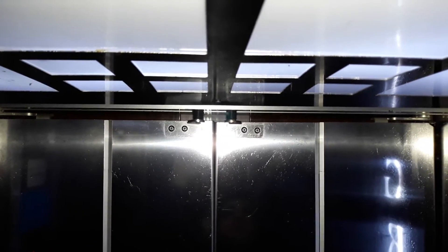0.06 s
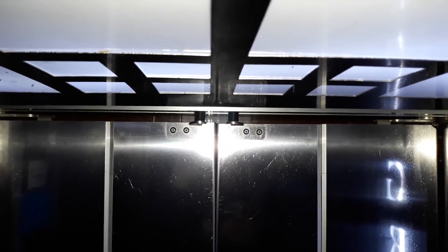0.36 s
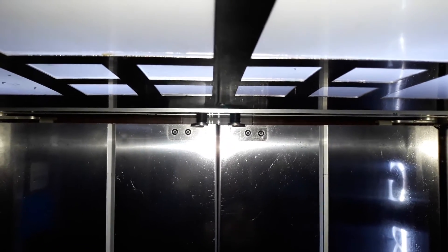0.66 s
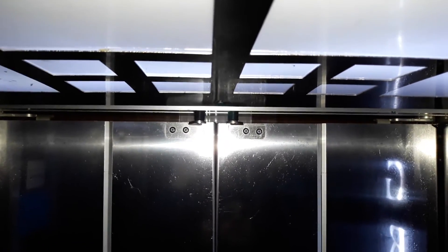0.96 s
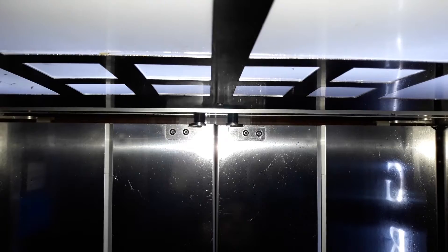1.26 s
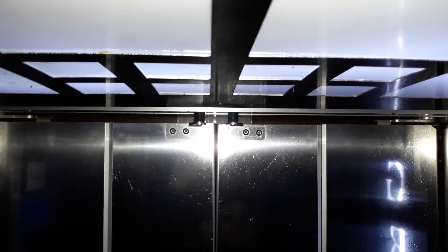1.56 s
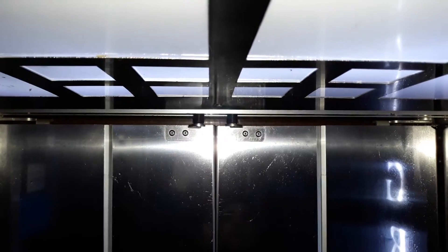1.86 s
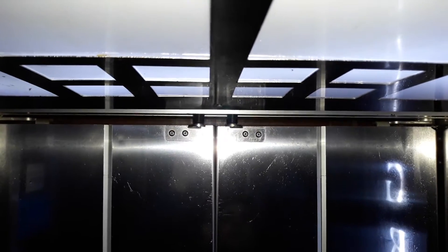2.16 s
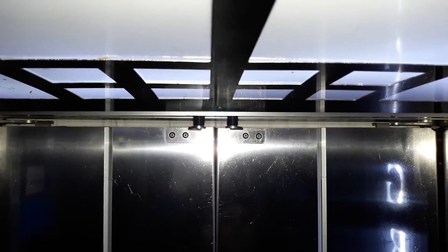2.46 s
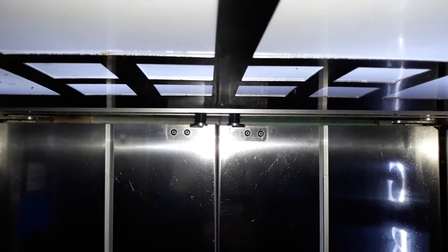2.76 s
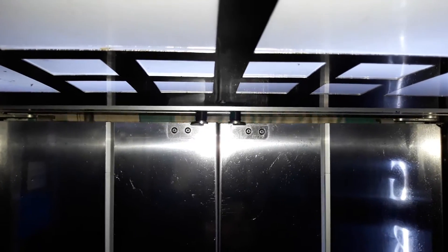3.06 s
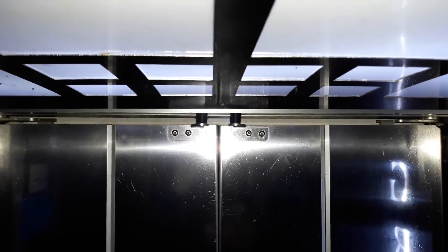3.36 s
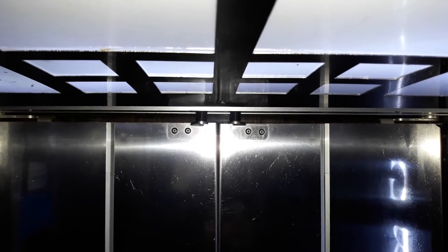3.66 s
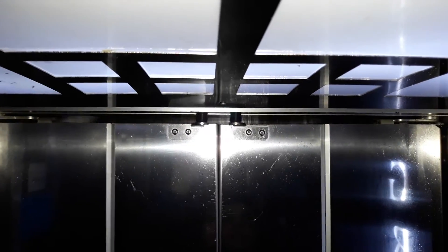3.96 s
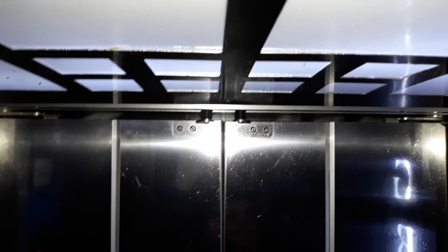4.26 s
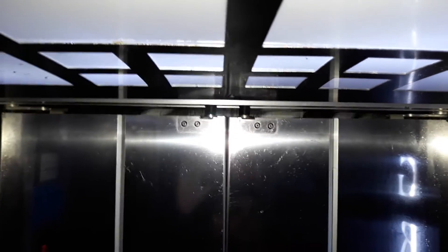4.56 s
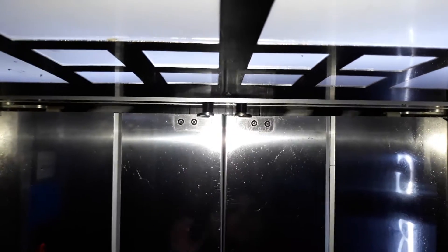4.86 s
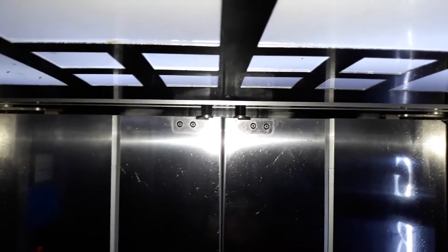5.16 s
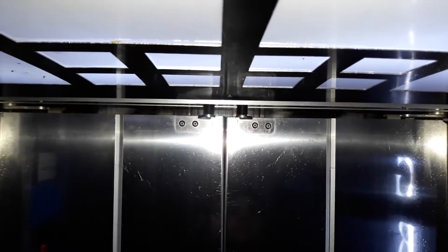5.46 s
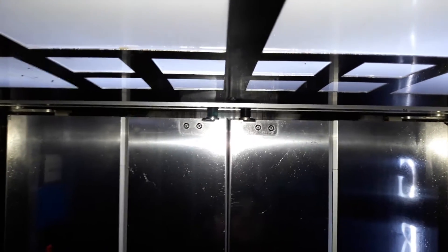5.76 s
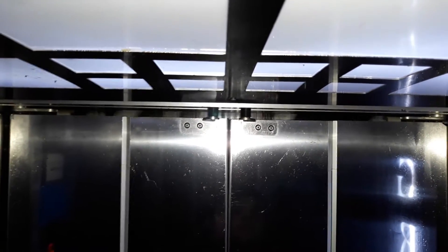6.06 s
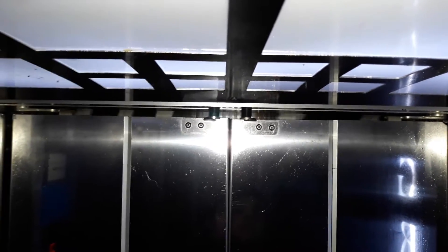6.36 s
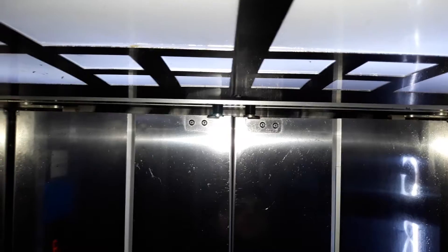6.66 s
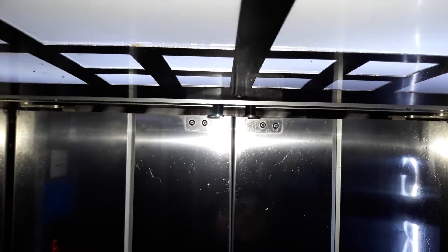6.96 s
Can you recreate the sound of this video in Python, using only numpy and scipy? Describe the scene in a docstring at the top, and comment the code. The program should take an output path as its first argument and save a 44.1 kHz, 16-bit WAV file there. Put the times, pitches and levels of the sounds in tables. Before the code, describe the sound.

Inside a closed steel elevator cab, the motor drones low, throbbing about three times a second over a faint rumble and air hiss. Close to the microphone, a hand rubs and ticks on something hard, making two hollow thuds and then one sharp knock. Afterwards the hum carries on, with a few faint, dull taps from the door panels and some light clicks near the end.

```python
"""Inside the closed steel cab of a travelling lift.
The hoist motor drones through the ropes and throbs about three times a second, once per turn of the
sheave. Behind it the guides rumble on the rails, air hisses in the shaft and a fan hums faintly.
Close by, a hand rubs and ticks on something hard by stick-slip friction and lands one sharp knock,
which excites the body's modes; the door panels give a few dull taps."""
import sys
import numpy as np
from scipy import signal
from scipy.fft import rfft, irfft
from scipy.io import wavfile
from scipy.ndimage import map_coordinates

SR = 44100
rng = np.random.default_rng(int(sys.argv[2]) if len(sys.argv) > 2 else 0)


def wav_record(signal):
    """Record a signal, one row per channel, as 16-bit PCM in the file named by sys.argv[1]."""
    frames = np.transpose(np.atleast_2d(signal))
    bounded = np.clip(frames, -1, 1)
    # unit amplitude maps onto the largest positive 16-bit level
    quanta = np.round(bounded * 32767).astype(np.int16)
    wavfile.write(sys.argv[1], SR, quanta)


N = 317948
TIME = np.arange(N) / SR
CUTOFF_HZ = 15700

# strokes of the hand: start t/s, duration/s, relative level/dB
STROKES = [(0, 0.82, -56), (0.136, 0.049, -34), (0.364, 0.021, -39.5), (.41, 0.072, -56),
           (0.611, 0.033, -34.5), (0.869, 0.11, -53.5), (1.144, 0.041, -58), (1.328, 0.13, -52),
           (1.835, 0.076, -36.5), (6.051, 0.023, -46), (6.279, 0.039, -61)]


def from_db(db):
    """Amplitude ratio of a level in decibels."""
    return 10 ** (np.asarray(db) / 20)


def rms_one(x):
    """Normalisation to unit rms."""
    return x / np.sqrt(np.mean(x ** 2) + 1e-20)


def in_time(rows):
    """Linear interpolation of (t/s, value) rows at every sample."""
    return np.interp(TIME, *np.transpose(rows))


def drift(rate):
    """Smooth random modulation: a spline through rate unit Gaussian values a second."""
    knots = rng.standard_normal(4096)
    return map_coordinates(knots, [TIME * rate], order=2, mode="mirror")


def tone(hz, waver_db, wander_rad):
    """A sinusoid of unit rms, then given slow random amplitude and phase modulation."""
    phase = 2 * np.pi * (hz * TIME + rng.random()) + wander_rad * drift(5)
    return np.sqrt(2) * np.sin(phase) * from_db(waver_db * drift(5))


def colour(x, spectrum):
    """Minimum-phase filtering by (f/Hz, relative level/dB) rows; white noise keeps its power."""
    size = 4096
    hz, db = np.transpose(spectrum)
    grid_hz = np.maximum(np.arange(size // 2 + 1) * SR / size, 1)
    magnitude = from_db(np.interp(np.log(grid_hz), np.log(hz), db))
    cepstrum = irfft(np.log(magnitude))
    response = irfft(np.exp(rfft(2 * cepstrum[:size // 2], size)))
    return signal.fftconvolve(x, response / np.linalg.norm(response))[:N]


def ring(force, hz, t60):
    """A damped oscillator: a unit impulse starts a decaying sinusoid of unit amplitude."""
    r, w = from_db(-60 / (t60 * SR)), 2 * np.pi * hz / SR
    return signal.lfilter([0, np.sin(w)], [1, -2 * r * np.cos(w), r * r], force + 1e-18)


def contacts(rows, t60, rise_s):
    """Impact noise: each contact is a short burst, and the softer it is, the lower its cutoff."""
    out, age = np.zeros(N + SR), np.arange(SR // 10) / SR
    envelope = (1 - np.exp(-age / rise_s)) * from_db(-60 * age / t60)
    for start, db, cutoff_hz in rows:
        burst = rng.standard_normal(len(age)) * envelope * from_db(db)
        lowpass = signal.butter(2, min(cutoff_hz, .45 * SR), fs=SR)
        at = int(start * SR)
        out[at:at + len(age)] += signal.lfilter(*lowpass, burst)
    return out[:N]


def cab(x, wet_db):
    """Reverberation: close steel walls reflect within milliseconds, and the treble decays first."""
    low_t60_s, high_t60_s = .29, .074
    age = np.arange(SR // 2) / SR
    echoes = rng.standard_normal(len(age)) * (age > .003)
    low = signal.lfilter(*signal.butter(1, 3000, fs=SR), echoes)
    tail = low * from_db(-60 * age / low_t60_s) + (echoes - low) * from_db(-60 * age / high_t60_s)
    return x + from_db(wet_db) * signal.fftconvolve(x, tail / np.linalg.norm(tail))[:N]


def shaft():
    """Broadband noise: the guides rumble on the rails, and air flow adds a thin, wavering hiss."""
    # spectra of guides and air: f/Hz, relative level/dB
    guide_spectrum = [(20, -15.5), (40, 1.5), (110, 13), (150, 1), (185, 4), (260, 2), (320, 0.5),
                      (380, -1), (470, -2.5), (550, -7.5), (730, -12.5), (780, -10.5), (860, -12),
                      (970, -22), (1600, -50), (4000, -70.5)]
    air_spectrum = [(700, -19), (1300, 1.5), (1570, -7), (1950, 3), (2200, 5.5), (2550, -1), (3250, -5),
                    (4900, -.3), (6600, -6.7), (8500, -6), (9400, -18), (10600, -21), (12200, -13.5),
                    (16000, -15)]
    # their envelopes: t/s, level/dB
    guide_levels = [(0, -47), (.2, -40), (1.2, -45.5), (2.1, -44.5), (2.8, -46), (3.9, -46), (5, -43.5),
                    (6.0, -46), (6.6, -47), (7.21, -48.5)]
    air_levels = [(0, -59), (2.15, -62), (2.9, -59.5), (3.75, -62.5), (4.5, -61), (5.65, -61.5),
                  (6.2, -60.5), (6.85, -65), (7.21, -60.5)]
    rumble = rms_one(colour(rng.standard_normal(N), guide_spectrum))
    rumble *= from_db(in_time(guide_levels) + 2.5 * drift(12))
    hiss = rms_one(colour(rng.standard_normal(N), air_spectrum))
    hiss *= from_db(in_time(air_levels) + .7 * drift(5))
    return rumble + hiss


def fan():
    """Periodic sources give a line spectrum: the ceiling fan and the mains hum faintly."""
    # spectral lines: f/Hz, level/dB
    lines = [(199.4, -58), (231.5, -56.5), (266.5, -60), (299.6, -61), (498.5, -68), (601, -68), (613, -70)]
    return sum(from_db(db) * tone(hz, waver_db=2, wander_rad=.6) for hz, db in lines)


def panels():
    """Plate vibration: soft impacts drive the hollow-sounding modes of the loose door panels."""
    # impacts: t/s, relative level/dB, cutoff f/Hz
    impacts = [(0.185, -38.5, 1000), (0.636, -39, 804), (1.325, -54, 3000), (2.650, -50, 5500),
               (2.656, -38, 945), (2.770, -55.5, 6100), (2.954, -56, 2200), (2.952, -37.5, 380),
               (4.469, -44, 650), (4.72, -45, 654), (5.756, -47.5, 1800), (5.870, -51.5, 1600),
               (5.995, -41.5, 600), (6.062, -51.5, 2510), (6.238, -51, 1800), (6.298, -53.5, 1970),
               (6.488, -54, 1500), (6.548, -52.5, 1200)]
    # spectrum of a tap: f/Hz, relative level/dB
    tap_spectrum = [(100, -35), (220, -12), (340, 1), (480, 3), (660, -1.5), (850, -0.5), (1150, -6.5),
                    (1600, -5), (2400, -3.5), (3300, -7.5), (6500, -10), (8500, 3.5), (9800, -17),
                    (16000, -30)]
    # panel modes: f/Hz, relative level/dB, T60/s
    modes = [(450, -3, 0.11), (515, -7, .1), (800, 5, 0.093), (830, -6.5, .13), (1600, -8.5, .05),
             (2030, -11.5, 0.07), (2500, 2, 0.11)]
    taps = contacts(impacts, t60=.06, rise_s=.006)
    ringing = sum(rms_one(ring(taps, hz, t60)) * from_db(db) * (-1) ** k
                  for k, (hz, db, t60) in enumerate(modes))
    tapping = cab(colour(from_db(18) * taps, tap_spectrum), wet_db=-4)
    return tapping + from_db(5.5) * np.std(taps) * ringing


def stroke(start, length):
    """Envelope of one rub: exponential growth, a hold and a slower exponential decay."""
    attack_s, release_s = .013, .016   # per 20 dB
    distance = np.maximum((start - TIME) / attack_s, (TIME - start - length) / release_s)
    return from_db(-20 * distance.clip(0, 10))


def slips(per_rub):
    """Friction releases small ticks at random, louder under a firmer hand: t/s, relative level/dB."""
    typical_db, coupling, scatter_db = -43.5, .64, 1
    mean_db = np.mean([db for _, _, db in STROKES])
    return [(start + length * rng.random(),
             typical_db + coupling * (db - mean_db) + scatter_db * rng.standard_normal())
            for start, length, db in STROKES for _ in range(per_rub)]


def hand():
    """Stick-slip friction of skin on a hard surface: grainy rubs and single sharp ticks."""
    # sharp contacts: t/s, relative level/dB
    tick_events = [(0.116, -38), (0.1235, -32), (0.24, -42), (0.2981, -39.5), (0.3586, -34), (0.4141, -34),
                   (0.442, -34), (0.475, -41), (0.4855, -36), (0.5006, -32.5), (0.538, -39.5),
                   (0.5737, -35), (0.594, -32), (0.692, -39), (0.7255, -45.5), (0.758, -41), (0.85, -41),
                   (0.8753, -33.5), (0.9398, -34), (1.3257, -44.5), (1.378, -34.5), (1.43, -40),
                   (1.673, -49), (1.8, -40.5), (1.839, -32), (1.97, -34), (4.475, -41), (5.899, -50),
                   (5.928, -50), (5.9928, -44), (6.042, -43), (6.237, -43.5), (6.2665, -44),
                   (6.2948, -41.5), (6.548, -47)]
    # spectrum of the friction: f/Hz, relative level/dB
    rub_spectrum = [(100, -32), (300, -5), (550, 0.5), (850, 6), (1200, -3), (2200, 4), (3200, -1),
                    (4300, 3), (6300, -5), (8500, -2.5), (9800, -14.5), (12500, -8), (16000, -13.5)]
    pressure = sum(from_db(db) * stroke(start, length) for start, length, db in STROKES)
    rubs = pressure * rng.standard_normal(N) * from_db(-3.5 + 3 * drift(400))
    hard_contacts = [(start, db, CUTOFF_HZ) for start, db in tick_events + slips(per_rub=3)]
    ticks = contacts(hard_contacts, t60=.035, rise_s=.00081)
    # each tick opens with a very short snap in the top octave
    highpass = signal.butter(2, 10500, "high", fs=SR, output="sos")
    snaps = signal.sosfilt(highpass, contacts(hard_contacts, t60=.004, rise_s=.0002))
    rubs = cab(colour(rubs, rub_spectrum), wet_db=-5.5)
    ticks = cab(colour(ticks, rub_spectrum), wet_db=-2)
    return rubs + ticks + snaps


def thuds():
    """Damped oscillation: two firm rubs each end in a hollow thud whose pitch sinks as it decays."""
    # thuds: t/s, relative level/dB
    onsets = [(0.175, -19), (0.619, -16)]
    start_hz, end_hz, sink_s = 430, 285, .028
    rise_s, t60_s = .017, .12
    out = 0
    for start, db in onsets:
        age = np.maximum(TIME - start, 0)
        hz = end_hz + (start_hz - end_hz) * np.exp(-age / sink_s)
        envelope = (1 - np.exp(-age / rise_s)) ** 2 * from_db(db - 60 * age / t60_s)
        out = out + envelope * np.sin(2 * np.pi * np.cumsum(hz) / SR)
    return cab(out * from_db(2 * drift(150)), wet_db=-17)


def knock():
    """Impulse excitation: one hard blow rings all the body's modes amid a clack of rapid contacts."""
    # modes of the struck body: f/Hz, relative level/dB, T60/s
    modes = [(290, -6, .18), (371, .5, .22), (428, -10, .14), (620, -8.5, .15), (670, -16, .1),
             (760, -19, .12), (807, -16, .13), (843, -8.5, .22), (871, -11, .21), (912, -14, .1),
             (965, -10, .18), (1138, -12, .15), (1278, -13, .11), (1430, -13, .1), (1711, -8, .15),
             (2099, -15, .09), (2686, -15, .08), (5090, -8, .06), (5431, -8, .06), (6760, -13, .07),
             (8420, -12, .09)]
    # contacts of the clack: t/s, relative level/dB, cutoff f/Hz
    impacts = [(1.896, -18.5, 1510), (1.900, -16.5, 1300), (1.902, -21.5, 12000), (1.908, -22, 10100),
               (1.913, -17.5, 420), (1.925, -20, 1630)]
    # spectrum of the clack: f/Hz, relative level/dB
    clack_spectrum = [(100, -4), (230, -1), (330, 8), (430, -5), (510, -5), (880, 7), (1400, -0.5),
                      (2400, 0.5), (3300, -2), (4500, -2), (5400, 3.5), (6500, -4.5), (8600, 3.5),
                      (9600, -8.5), (16000, -5.5)]
    blow_s, blow_db = 1.9012, -20
    blow = from_db(blow_db) * signal.unit_impulse(N, int(blow_s * SR))
    ringing = sum(ring(blow, hz, t60) * from_db(db) * (-1) ** k for k, (hz, db, t60) in enumerate(modes))
    clack = colour(from_db(5) * contacts(impacts, t60=.079, rise_s=.00094), clack_spectrum)
    return ringing + cab(clack, wet_db=-14)


def throb(hz, rows, lag_turns):
    """Beating: a motor order interferes with a sideband one sheave rate above it."""
    # minima of the drone, one per turn of the slightly uneven sheave: t/s
    dips = [-.2, .11, .4, .76, 1.08, 1.42, 1.78, 2.11, 2.39, 2.72, 3.04, 3.36, 3.64, 3.99, 4.32, 4.7, 5.04,
            5.38, 5.72, 6.0, 6.3, 6.55, 6.95, 7.3]
    times, levels, depths = np.transpose(rows)
    level_db, depth = np.interp(TIME, times, levels), np.interp(TIME, times, depths)
    phase = 2 * np.pi * (hz * TIME + rng.random()) + .028 * drift(24)
    sheave_angle = 2 * np.pi * (np.interp(TIME, dips, np.arange(len(dips))) - lag_turns)
    return np.sqrt(2) * from_db(level_db) * (np.sin(phase) - depth * np.sin(phase + sheave_angle))


def motor():
    """Harmonics of the rotation rate: the orders near the cab's resonance carry the drone and throb."""
    rotation_hz = 24.665
    # order 3, and order 4 on the cab's resonance: t/s, level/dB, throb depth (0-1)
    third = [(0, -49, 1), (.8, -42, 0.6), (1.549, -39, 0.45), (1.8, -35.5, 0.17), (2.9, -42, 0.4),
             (3.299, -57, 0.5), (4.152, -44, 0.5), (4.801, -39.5, 0), (5.7, -34.5, 0), (6.3, -33, 0.06),
             (7.21, -41.5, 0.3)]
    fourth = [(0, -24.6, .12), (.55, -25.6, .05), (.76, -27, .45), (1.08, -26.5, .47), (1.24, -22.5, .3),
              (1.64, -20, .2), (2.1, -25.8, .78), (2.4, -24.5, .4), (2.72, -25.3, .65), (3.05, -25.3, .5),
              (3.36, -26.3, .58), (3.64, -27, .55), (3.98, -26, .3), (4.32, -26, .48), (4.62, -23.5, .2),
              (5.3, -24.5, .1), (5.8, -33, .15), (6.18, -29, .15), (6.56, -41, .15), (6.64, -27.7, .08),
              (7.21, -26.7, .08)]
    # orders that swell and fade: t/s, level/dB
    second = [(0, -50), (2.2, -50.5), (3.0, -57), (4.4, -50), (7.21, -46)]
    eleventh = [(0, -56), (.4, -47.5), (1.0, -56), (2.1, -56.5), (2.5, -54), (3.4, -51.5), (4.2, -56.5),
                (4.65, -53), (5.5, -58.5), (6.5, -63.5), (7.21, -50.5)]
    fourteenth = [(0, -61.5), (4.6, -62), (4.95, -51), (5.4, -61.5), (5.85, -53), (6.3, -62), (7.21, -59.5)]
    # weak harmonics: order, level/dB
    weak_orders = [(1, -64), (6, -61), (7, -57), (8, -60), (9, -62), (15, -67), (18, -62.5), (19, -67)]
    bass = from_db(in_time(second)) * tone(2 * rotation_hz, waver_db=1.2, wander_rad=.12)
    drone = throb(3 * rotation_hz, third, lag_turns=.43) + throb(4 * rotation_hz, fourth, lag_turns=0)
    singing = sum(from_db(in_time(levels)) * tone(order * rotation_hz, waver_db=1.5, wander_rad=.6)
                  for order, levels in ((11, eleventh), (14, fourteenth)))
    hum = sum(from_db(db) * tone(order * rotation_hz, waver_db=3, wander_rad=.6)
              for order, db in weak_orders)
    return bass + drone + singing + hum


def scene():
    """Superposition of all sources at one point in the cab."""
    return (motor() + fan() + shaft() + hand() + thuds() + panels() + knock())[None]


def record(dry):
    """Band limiting: a steep elliptic low-pass removes the highest treble."""
    return signal.sosfilt(signal.ellip(10, .1, 80, CUTOFF_HZ, fs=SR, output="sos"), dry)


dry = scene()
out = record(dry)
wav_record(out)
```